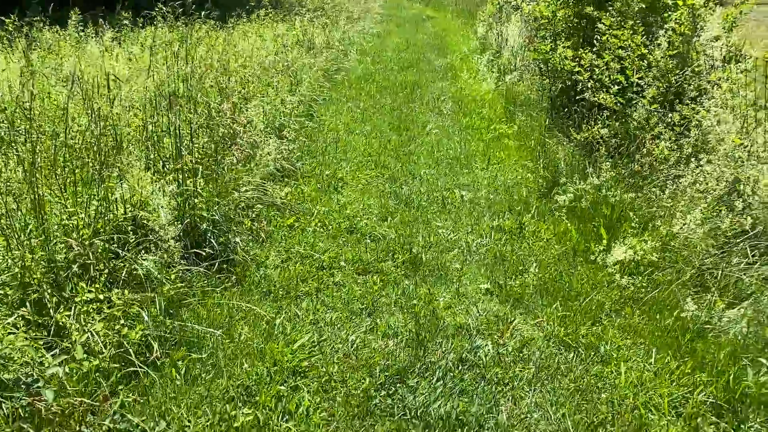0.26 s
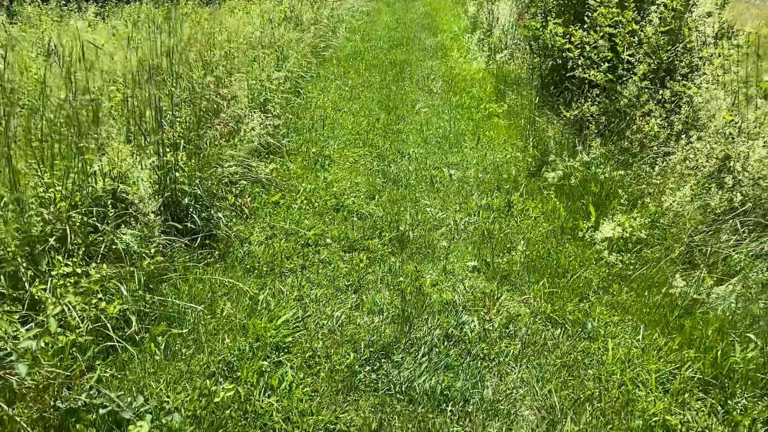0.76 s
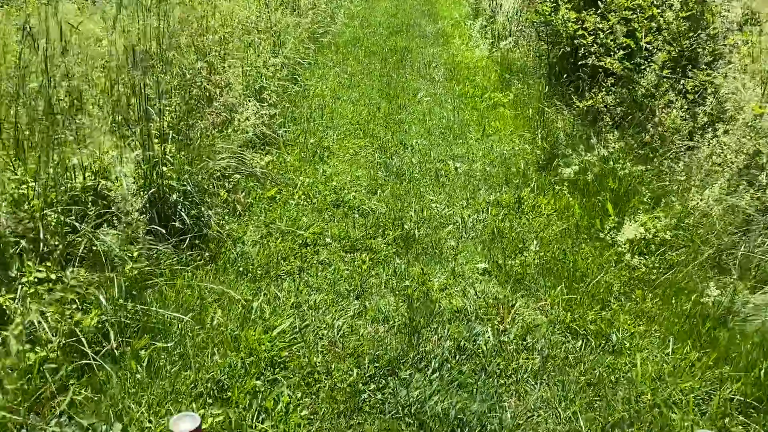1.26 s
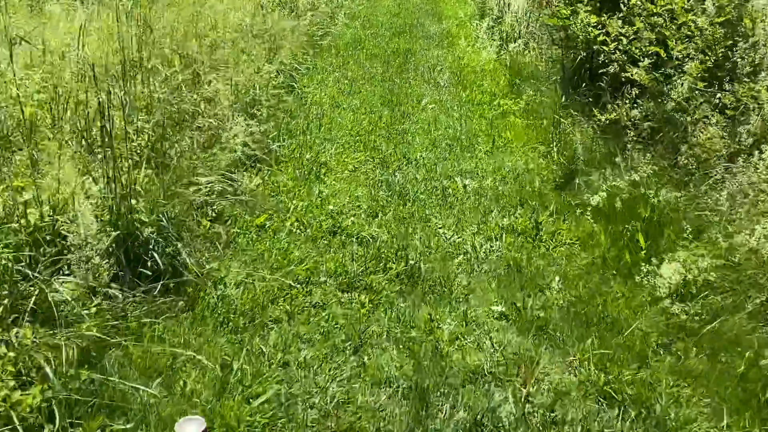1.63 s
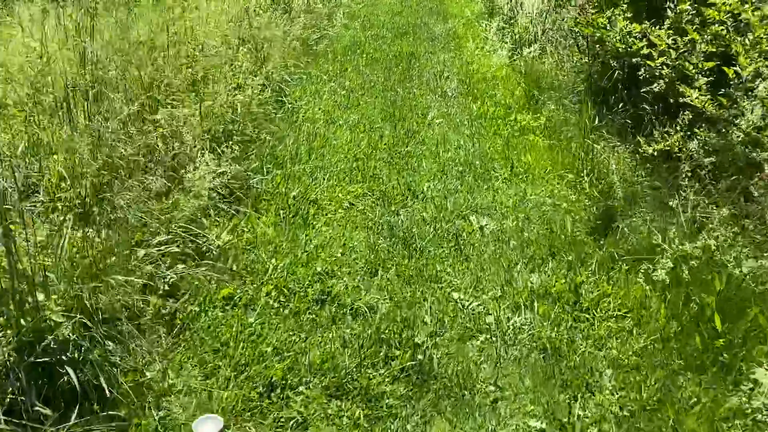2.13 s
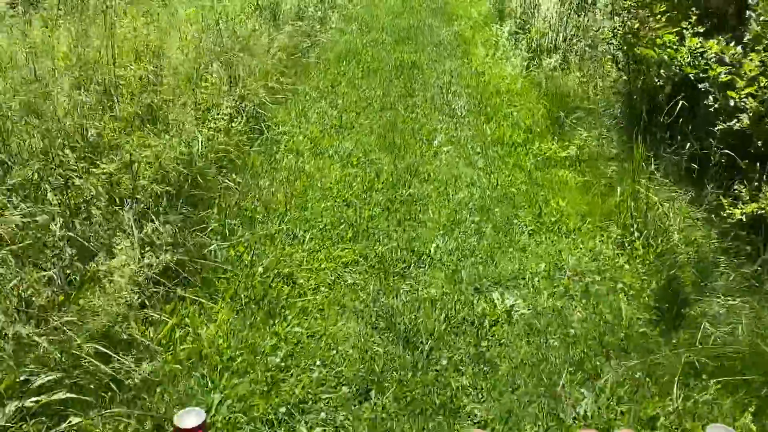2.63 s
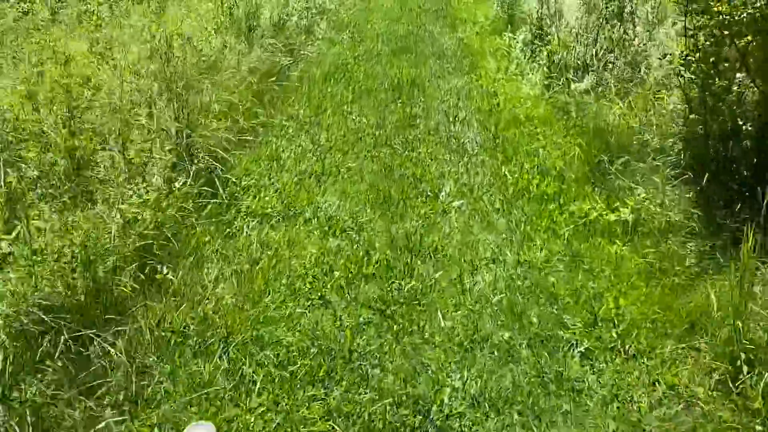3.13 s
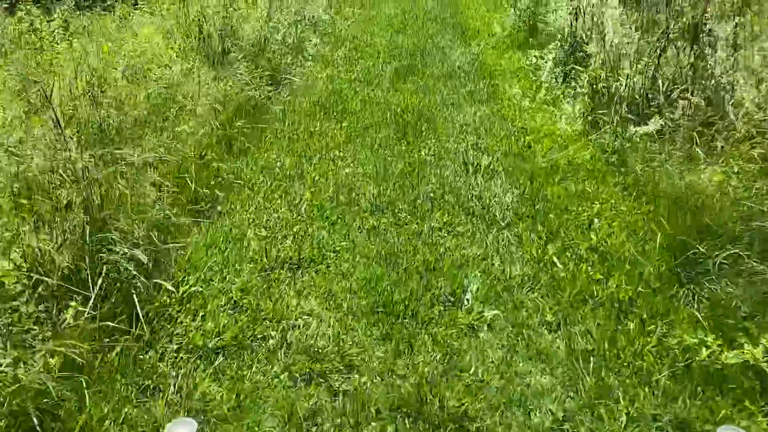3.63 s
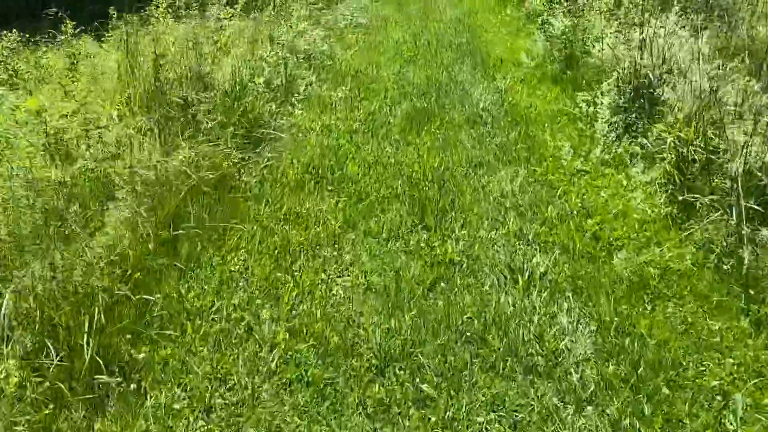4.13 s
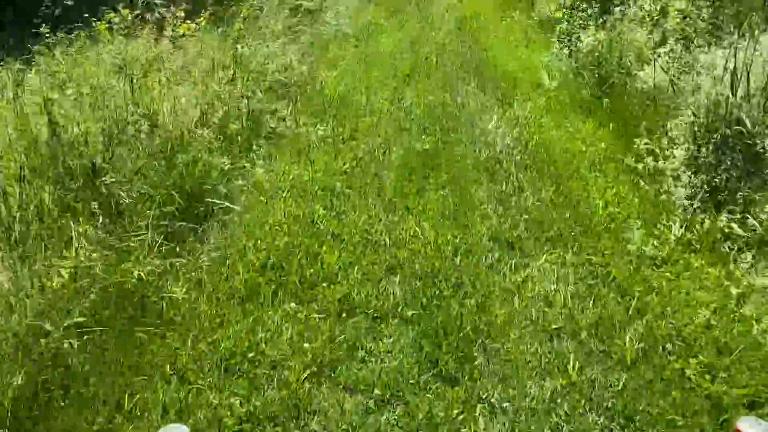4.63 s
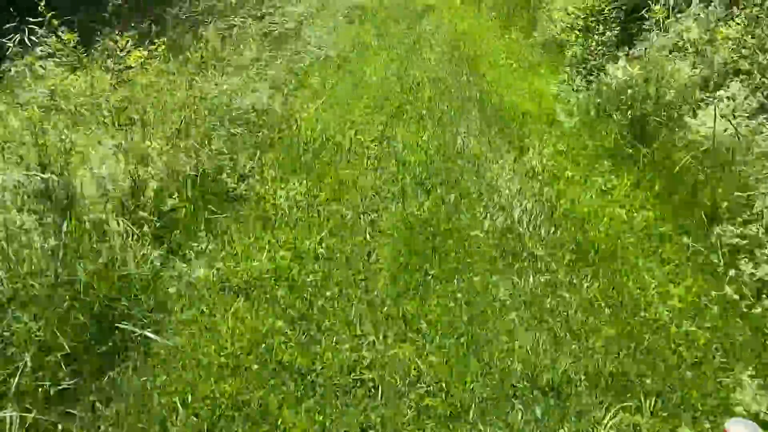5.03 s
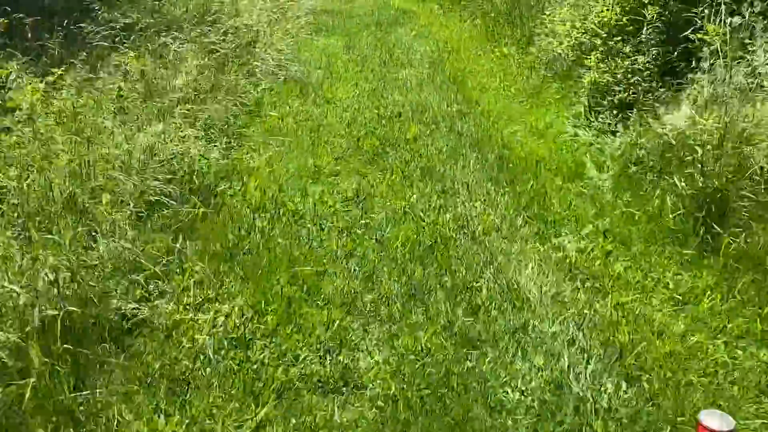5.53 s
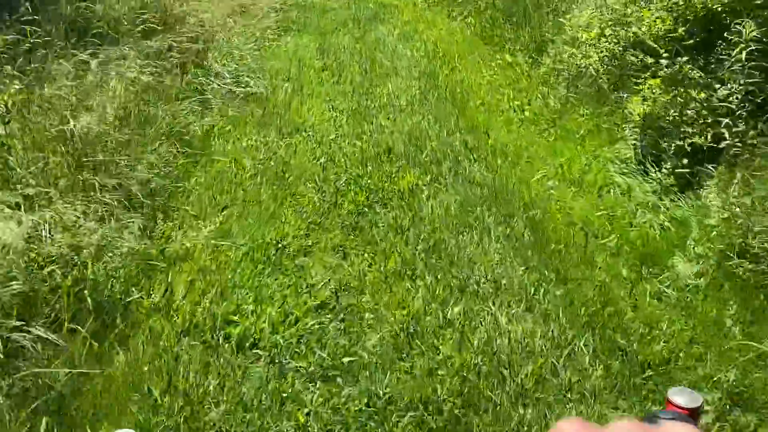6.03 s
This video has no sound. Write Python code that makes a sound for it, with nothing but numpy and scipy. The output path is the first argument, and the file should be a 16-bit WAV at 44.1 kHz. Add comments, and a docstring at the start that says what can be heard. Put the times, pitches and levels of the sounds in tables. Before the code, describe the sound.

Loud steady mower engine and whirling blades hum and throb, with grassy hiss, dull thuds of clippings and brief faint squeals.

```python
"""Three mower blades drone and beat against each other while air roars under the deck, heard from the seat.
Blade harmonics make the drone, shaped noise the roar and the thuds of clippings; a V-twin adds tones and clatter.
Two hydraulic pumps whine faintly and squeal at times, a narrow hiss dies away early,
and cut stalks fizz and tick in bright noise. Blades, engine and pumps all follow one belt speed."""
import sys
import numpy as np
from scipy import signal
from scipy.fft import rfft, irfft
from scipy.io import wavfile

SR = 44100
rng = np.random.default_rng(int(sys.argv[2]) if len(sys.argv) > 2 else 0)


def int16_out(signal):
    """Quantize to a 16-bit WAV file."""
    q = np.round(np.clip(np.atleast_2d(signal).T, -1, 1) * 32767)
    wavfile.write(sys.argv[1], SR, q.astype(np.int16))


N = 276948
TIME = np.arange(N) / SR  # s
FREQS = np.maximum(np.arange(N // 2 + 1) * SR / N, 1)  # Hz, kept above 0 for the log axis


def undb(db):
    """Decibels to gain."""
    return 10 ** (np.asarray(db) / 20)


def curves(table):
    """Each column of a table, joined by straight lines in time."""
    time_s, *columns = np.transpose(table)
    return [np.interp(TIME, time_s, column) for column in columns]


def at(table, hz):
    """A spectrum read on a log-frequency axis."""
    table_hz, value = np.transpose(table)
    return np.interp(np.log(hz), np.log(table_hz), value)


def walk(rate):
    """Smooth random drift that eases to a new value `rate` times a second, 150 at most."""
    knots = rng.standard_normal(1024)
    place = TIME * min(rate, 150)
    k = place.astype(int)
    ease = (1 - np.cos(np.pi * (place - k))) / 2
    return knots[k] + ease * (knots[k + 1] - knots[k])


def throb(turns, depth):
    """A swell once a turn."""
    return 1 + depth * np.cos(2 * np.pi * turns)


def swells(table, multiple):
    """Gain of one harmonic that swells, holds and lets go at the listed times."""
    attack_s, release_s = 0.045, 0.065
    gain = np.zeros(N)
    for start_s, length_s, k, level_db in table:
        if round(k) == round(multiple):
            rise = (TIME - start_s) / attack_s
            fall = 1 - (TIME - start_s - length_s) / release_s
            gain = gain + undb(level_db) * np.clip(np.minimum(rise, fall), 0, 1)
    return gain


def colour(x, spectrum, band):
    """Give sound a spectrum, with rms 1 inside the band (Hz)."""
    shaped = rfft(x) * undb(at(spectrum, FREQS))
    inside = shaped[..., (FREQS > band[0]) & (FREQS < band[1])]
    rms = np.sqrt(2 * np.mean(np.sum(abs(inside) ** 2, axis=-1))) / N
    return irfft(shaped, N) / rms


def spread(mid, side, hz):
    """Place spectra in stereo: likeness and balance of left and right depend on frequency."""
    # likeness of left and right: pitch_hz, correlation (0-1)
    likeness = [(60, 0.95), (170, 0.77), (300, 0.85), (450, 0.46), (650, 0.15), (1000, 0.0023),
                (3000, 0.04), (4500, 0.48), (5700, 0), (6800, 1), (9000, 0)]
    # balance: pitch_hz, left_minus_right_db
    tilt = [(100, 2.5), (200, 7.5), (380, -1), (700, -1.5), (1290, 4.5), (2380, 4.5), (4400, 4.5),
            (8000, 4.5)]
    alike = np.clip(at(likeness, hz), -.999, .999)
    half_tilt_db = at(tilt, hz) / 2
    mid = mid * np.sqrt((1 + alike) / 2)
    side = side * np.sqrt((1 - alike) / 2)
    return np.array([(mid + side) * undb(half_tilt_db), (mid - side) * undb(-half_tilt_db)])


def tones(turns, multiples, db):
    """Harmonics of a turning shaft: one period is built, then read at the shaft's angle."""
    size = 4096  # samples in the period
    k = np.rint(multiples).astype(int)
    chance = rng.random((len(k), 2))
    mid = undb(db) * np.exp(2j * np.pi * chance[:, 0]) * size / np.sqrt(2)
    side = 1j * mid * np.sign(chance[:, 1] - .5)
    mean_hz = turns[-1] / TIME[-1]
    period = np.zeros((2, size // 2 + 1), complex)
    period[:, k] = spread(mid, side, k * mean_hz)
    place = turns % 1 * size
    # the first sample is repeated at the end to close the loop
    return np.array([np.interp(place, np.arange(size + 1), np.append(p, p[0])) for p in irfft(period)])


def panels(hz):
    """Ringing sheet metal of deck and covers: gain of its resonances at each frequency."""
    # resonances: pitch_hz, width_hz, lift_db (each taken alone)
    resonances = [(568, 13, 5.5), (863, 12, 3.5), (1067, 94, 3), (1276, 28, 1.5), (1556, 32, 5),
                  (1917, 33, 5.5), (2300, 45, 0), (2500, 100, -1.5), (3124, 67, 5), (3400, 48, 7),
                  (3670, 45, -2), (5170, 130, 5), (5770, 270, 8.5)]
    return 1 + sum((undb(lift_db) - 1) / (1 + (2 * (hz - pitch_hz) / width_hz) ** 2)
                   for pitch_hz, width_hz, lift_db in resonances)


def air(shift_db=0.37):
    """Turbulence: stereo noise coloured by the panels, in seven bands that swell and sink on their own."""
    sound = spread(*rfft(rng.standard_normal((2, N))) * panels(FREQS), FREQS)
    place = np.clip(1.5 * np.log2(FREQS / 300), 0, 6)  # overlapping bands, 2/3 octave apart
    return sum(irfft(sound * np.maximum(1 - abs(place - k), 0), N) * undb(shift_db * walk(3.08))
               for k in range(7))


def valve():
    """A narrow hiss, likely oil through a valve: noise in one resonance that dies away early."""
    # time_s, level_db
    valve_level = [(0, -44), (0.35, -43), (0.7, -51), (1.2, -77)]
    pitch_hz, width_hz = 2460, 130
    ring = 1 / (1 + (2 * (FREQS - pitch_hz) / width_hz) ** 2)
    hiss = irfft(spread(*rfft(rng.standard_normal((2, N))), FREQS) * ring, N)
    return hiss / hiss.std() * undb(curves(valve_level)[0])


def pumps(passes, hunt=0.04, ripple=0.011, waver_db=2.5, second_db=-8):
    """Two piston pumps, one for each drive wheel, whine at nearly the same speed; the loaded one squeals."""
    # piston strokes per blade pass: loaded pump, other pump
    pistons_per_pass = (3.472, 3.485)
    # faint whine: multiple of the piston rate, level_db before the waver
    pump_tones = [(5, -53.5), (6, -63), (8, -54), (9, -59), (10, -55)]
    # squeals under a steering push: start_s, length_s, multiple of the piston rate, level_db
    squeals = [(0.56, 0.73, 8, -48), (0.76, 0.11, 8, -49), (1.0, 0.2, 8, -55), (0.98, 0.11, 10, -48),
               (1.38, 0.072, 8, -46), (1.73, 0.088, 8, -42), (1.87, 0.1, 8, -50), (2.06, 0.13, 10, -50),
               (2.41, 0.09, 8, -41.5), (2.53, 0.47, 10, -60), (2.69, 0.19, 8, -47), (3.57, 0.17, 8, -45),
               (4.59, 0.1, 8, -46)]
    # slow hunting and fast pressure ripple, in strokes, roughen both pumps
    loaded, other = (passes * ratio + hunt * walk(9.1) + ripple * walk(90) for ratio in pistons_per_pass)
    whine = 0
    for k, level_db in pump_tones:
        gain = undb(level_db + waver_db * walk(20)) + swells(squeals, k)
        whine = whine + tones(loaded, [k], [0]) * gain
    return whine + tones(other, *np.transpose(pump_tones)) * undb(second_db + waver_db * walk(20))


def tufts():
    """Tough tufts going through the blades: short swishes of shaped noise above the steady hiss."""
    # start_s, length_s, level_db
    cuts = [(1.835, 0.015, -38), (2.115, 0.02, -40), (3.15, 0.13, -40.5), (3.535, 0.02, -38),
            (3.61, 0.018, -37.5), (4.35, 0.02, -41), (6.2, 0.02, -38.5)]
    # colour of the swish: pitch_hz, relative density_db (per Hz)
    swish = [(1000, -20), (3500, 1), (6500, -4), (8300, -8), (11000, -4), (16000, -14)]
    attack_s, release_s = 0.0056, 0.017
    gain = 0
    for start_s, length_s, level_db in cuts:
        rise = (TIME - start_s) / attack_s
        fall = 1 - (TIME - start_s - length_s) / release_s
        gain = gain + undb(level_db) * np.clip(np.minimum(rise, fall), 0, 1)
    return colour(rng.standard_normal((2, N)), swish, band=(3000, 12000)) * gain


def grass(cycles, ticks_per_s=600, size_db=3.6, ticks_db=-5.0, patchy_db=1.06, scatter_db=-11,
          port_lag_s=0.0001826):
    """Stalks snap and strike the deck: dense ticks in a hiss that reaches the left side first."""
    # colour of cut stalks: pitch_hz, relative density_db (per Hz)
    stalks = [(2000, -3), (5000, -1.5), (7000, -2), (8300, 2), (10000, 1.5), (12000, 0), (13500, 2),
              (15000, -4.5), (16000, -3)]
    chance, size = rng.random(N), rng.exponential(size=N)
    ticks = (chance < ticks_per_s / SR) * undb(size_db * np.minimum(size, 5))
    burst = rng.standard_normal(128) * np.exp(-np.arange(128) / 30)  # one tick, decay in samples
    ticks = signal.fftconvolve(ticks, burst)[:N]
    fizz = rng.standard_normal(N) + undb(ticks_db) * ticks / ticks.std()
    late = irfft(rfft(fizz) * np.exp(-2j * np.pi * FREQS * port_lag_s), N)
    both = np.array([fizz, late]) + undb(scatter_db) * rng.standard_normal((2, N))
    both = both * undb(patchy_db * walk(16)) * throb(2 * cycles, depth=0.015)
    return colour(both, stalks, band=(9000, 12000))


def thuds(size_db=2.0, clump_decay_s=0.0056):
    """Clumps of clippings hit the deck in short dull bursts: many small at random, a few big ones listed."""
    # dull colour: pitch_hz, relative density_db (per Hz)
    thud = [(300, -19), (550, 5), (1050, -1.5), (1800, -13), (3000, -21), (8000, -58)]
    # big clumps that stand out: start_s, level_db
    clumps = [(1.011, -21), (1.664, -20), (1.806, -18), (2.361, -19), (2.479, -22), (2.66, -19),
              (3.482, -18), (3.694, -21), (4.57, -21), (5.07, -19)]
    small_db, hits_per_s, small_decay_s = -35, 34, 0.0082
    hits = (rng.random(N) < hits_per_s / SR) * undb(size_db * np.clip(rng.standard_normal(N), -2, 2))
    bursts = signal.lfilter([1], [1, -np.exp(-1 / (small_decay_s * SR))], hits)
    bursts = bursts / np.sqrt(np.mean(bursts ** 2)) * undb(small_db)
    for start_s, level_db in clumps:
        decay = np.exp(-abs(TIME - start_s) / clump_decay_s)
        bursts = bursts + undb(level_db) * (TIME >= start_s) * decay
    noise = rng.standard_normal((2, N)) * bursts
    rattle = irfft(spread(*rfft(noise) * panels(FREQS), FREQS), N)
    return colour(rattle, thud, band=(480, 1400)) * np.sqrt(np.mean(bursts ** 2))


def clatter(cycles, firing_depth=0.044, cycle_depth=0.049):
    """Valve gear and cooling air: shaped noise that throbs in time with the crank."""
    # engine covers and cooling air: pitch_hz, relative density_db (per Hz)
    covers = [(500, -28), (1200, -4), (1900, 0), (2500, 3.5), (3300, -5), (4200, -5), (4700, -6.5),
              (5400, -13), (6400, -16), (7500, -12), (10000, -64), (16000, -43)]
    beat = throb(2 * cycles, firing_depth) * throb(cycles, cycle_depth)
    return colour(air() * beat, covers, band=(2000, 6000))


def engine(cycles, wobble=0.0015, uneven_db=0.5):
    """Every four-stroke cycle repeats the same exhaust beats and knocks, a little unevenly."""
    # strong tones: multiple of the four-stroke cycle, level_db before the unevenness
    engine_tones = [(1, -57), (2, -27), (3, -39), (5, -37.5), (8, -41), (9, -38.5), (10, -39.5), (13, -36),
                    (18, -34.5), (24, -42), (26, -43), (30, -48.5), (31, -42.5), (36, -45), (41, -42),
                    (48, -48), (53, -52), (61, -45), (62, -55)]
    # comb of weak tones between them: pitch_hz, level_db (per tone)
    engine_comb = [(100, -42), (400, -39.5), (800, -53.5), (1200, -47.5), (1700, -55.5), (2600, -70)]
    strong, strong_db = np.transpose(engine_tones)
    weak = np.setdiff1d(np.arange(4, 90), np.rint(strong))
    weak_db = at(engine_comb, weak * cycles[-1] / TIME[-1])
    angle = cycles + wobble * walk(14)
    return tones(angle, strong, strong_db) * undb(uneven_db * walk(29)) + tones(angle, weak, weak_db)


def deck(passes, cycles, chop_depth=0.063, firing_depth=0.04, swirl_db=1.0):
    """Air whirls under the deck, chopped by every blade pass and shaken by the firings."""
    # air in the deck: pitch_hz, relative density_db (per Hz)
    roar = [(20, -10), (40, -26), (65, -9), (110, -1.5), (200, 2), (330, 4), (450, -0.5), (560, 0.5),
            (720, -4.5), (900, -2), (1400, -11), (1850, -13), (2400, -29), (6000, -55)]
    chopped = air() * throb(passes, chop_depth) * throb(2 * cycles, firing_depth)
    return colour(chopped * undb(swirl_db * walk(40)), roar, band=(480, 1400))


def blades(passes, slipped, flutter_db=0.26, drift=0.0072, slip=0.049, buffet_db=3.5, port_lag=0.0035,
           buzz_db=-5.5, flare_slip=0.014, ragged_db=2.5):
    """Pressure pulses as each blade tip passes; one spindle slips on the belt, so harmonic k beats k times as fast."""
    # drone, a row per harmonic from the first: relative level_db, slipping share (0-1), in_step_s, drift_db_per_s
    drone_rows = [(-12.0, 0.19, 1.88, -0.48), (-21, 0.45, 1.9, 0.8), (-20.5, 0.39, 2.713, 0.1)]
    # level of the drone harmonics: time_s, first_db, second_db, third_db (added to the rows above)
    hum_level = [(0, -0.5, 0, 1), (0.75, 0.7, 0.5, 0), (1.35, 0.1, 0.2, 0), (1.5, 0.4, -1, -2.5),
                 (1.92, 0.5, -0.5, -5), (2.05, -0.5, -0.5, 0.5), (2.7, 0, 1.5, -1), (3.3, 1, 1, 1.5),
                 (3.8, 0.8, -1, -1.5), (4.5, 0.5, -1, -0.5), (5.25, -3, -1, 1.5), (5.75, -1, 0.2, 2),
                 (6.2, -0.5, 1.5, -2.5)]
    # upper harmonics: multiple of the blade-pass rate, relative level_db
    blade_buzz = [(4, -35), (5, -36.5), (6, -36.5), (7, -43), (8, -40), (10, -41.5), (12, -42.5), (14, -52)]
    # upper harmonics ring up in the deck: start_s, length_s, multiple of blade-pass rate, level_db before raggedness
    flare_rows = [(0.023, 0.24, 4, -25), (0.46, 0.55, 4, -28), (1.17, 0.18, 4, -29), (2.447, 0.1, 4, -26.5),
                  (2.78, 0.24, 4, -26), (3.05, 0.5, 5, -30), (3.3, 0.32, 4, -28.5), (3.76, 0.49, 7, -30.5),
                  (4.6, 0.24, 4, -29), (5.02, 0.62, 4, -28), (5.8, 0.1, 4, -28), (6.102, 0.077, 4, -23.5)]
    ports = passes + port_lag * np.array([[-.5], [.5]])  # left lags right, in passes
    drone = 0
    for k, (row, hum_db) in enumerate(zip(drone_rows, curves(hum_level)), 1):
        level_db, share, in_step_s, db_per_s = row
        angle = k * (ports + (k - 1) * drift * walk(9.4))  # the higher harmonics wander more
        behind = k * (slipped - np.interp(in_step_s, TIME, slipped))
        pair = np.sin(2 * np.pi * angle) + share * np.sin(2 * np.pi * (angle - behind))
        swell_db = db_per_s * TIME + hum_db
        drone = drone - np.sqrt(2) * undb(level_db + swell_db + k * flutter_db * walk(20)) * pair
    # three copies, each wandering and buffeted on its own
    buzz = sum(tones(passes + slip * walk(4), *np.transpose(blade_buzz)) * undb(buffet_db * walk(28))
               for _ in range(3))
    flaring = sorted({round(row[2]) for row in flare_rows})
    flares = sum(tones(passes + flare_slip * walk(22), [k], [0]) * swells(flare_rows, k) for k in flaring)
    flares = flares * undb(ragged_db * walk(30))
    return drone * undb([[-.25], [.25]]) + buzz * undb(buzz_db) + flares


def scene():
    """One belt ties blades, engine and pumps together; the slip grows as speed sags, hiss and clatter follow the grass."""
    # governed speed, sagging in thicker grass: time_s, blade_pass_hz
    speed = [(0.0, 110.0), (0.8, 109.8), (1.5, 108.4), (2.75, 107.3), (3.3, 107.9), (4.5, 108.6),
             (5.3, 108.25), (6.28, 108.2)]
    # flow of grass through the deck: time_s, level_db (above the usual)
    load = [(0, -3.5), (0.5, -3), (0.95, -0.5), (1.6, -1.4), (2.45, 0.9), (2.9, 0.5), (3.25, 2),
            (4.2, -0.5), (5.6, -0.9), (6.28, 0.5)]
    # level of the deck roar: time_s, level_db
    roar_level = [(0, -24.5), (1.6, -24.5), (2.1, -24), (2.45, -23.5), (3.4, -23.5), (4.2, -23.5),
                  (5.6, -25), (6.28, -25)]
    cycles_per_pass = 1 / 3.713  # four-stroke cycles per blade pass
    slip_hz, slip_per_sag = .16, 0.038  # lag of one spindle; Hz more for each Hz below the mean speed
    hiss_db = -45  # at the usual flow; follows the flow dB for dB
    clatter_db, clatter_per_load = -34.5, 0.62  # at the usual flow; dB per dB of flow
    pass_hz, = curves(speed)
    load_db, = curves(load)
    roar_db, = curves(roar_level)
    passes = np.cumsum(pass_hz) / SR
    slipped = np.cumsum(slip_hz + slip_per_sag * (pass_hz.mean() - pass_hz)) / SR
    cycles = passes * cycles_per_pass
    return (valve() + pumps(passes) + tufts()
            + grass(cycles) * undb(hiss_db + load_db)
            + thuds()
            + clatter(cycles) * undb(clatter_db + clatter_per_load * load_db)
            + engine(cycles)
            + deck(passes, cycles) * undb(roar_db)
            + blades(passes, slipped))


def record(dry):
    """Round the highest peaks softly, then cut the extreme treble with a steep low-pass."""
    ceiling, top_hz = 0.96, 15800  # ceiling as a share of full scale
    rounded = dry / (1 + abs(dry / ceiling) ** 10) ** (1 / 10)
    return signal.sosfilt(signal.ellip(8, .2, 70, top_hz, fs=SR, output="sos"), rounded)


dry = scene()
out = record(dry)
int16_out(out)
```